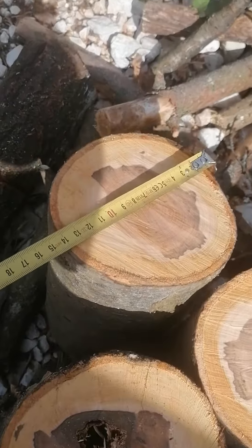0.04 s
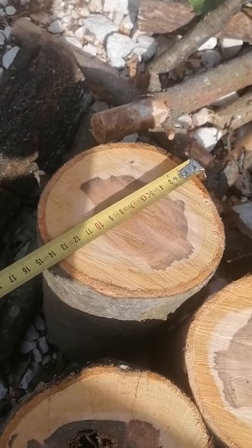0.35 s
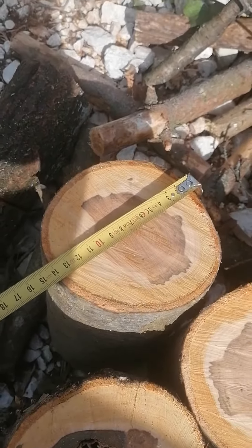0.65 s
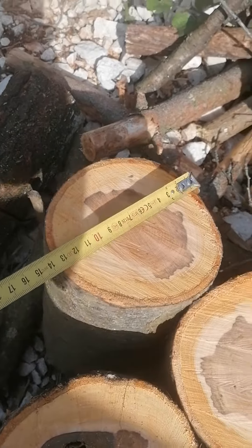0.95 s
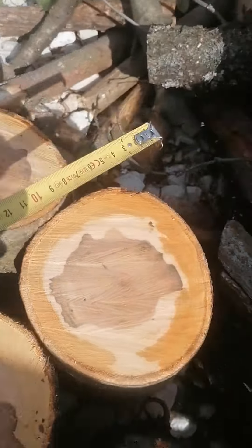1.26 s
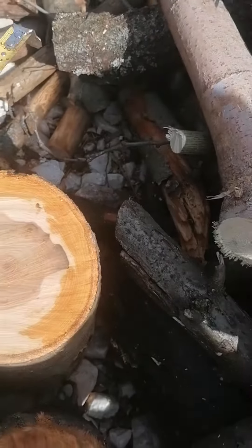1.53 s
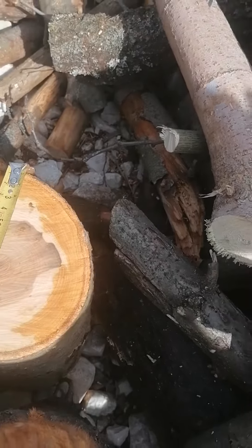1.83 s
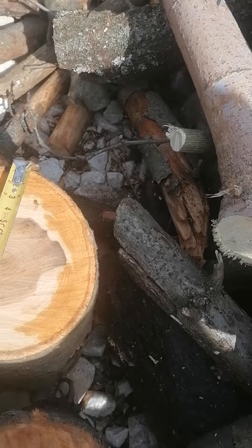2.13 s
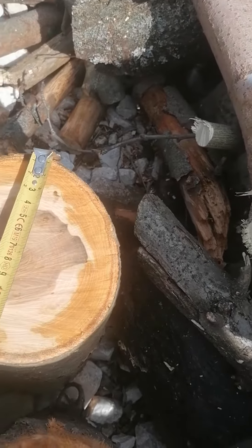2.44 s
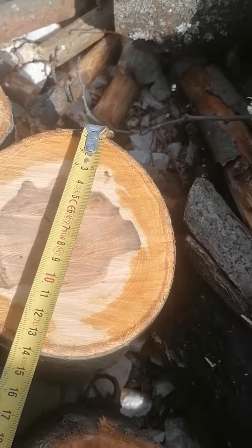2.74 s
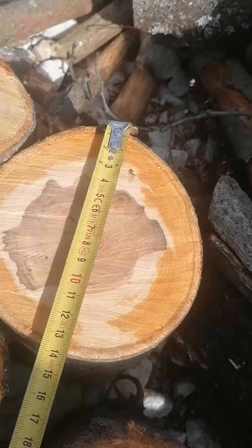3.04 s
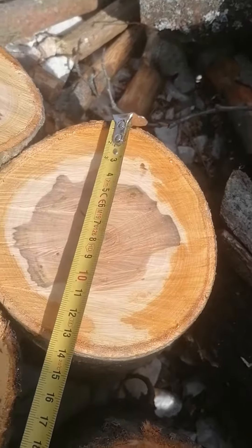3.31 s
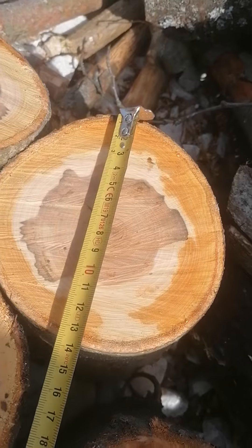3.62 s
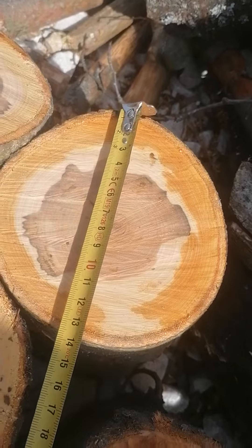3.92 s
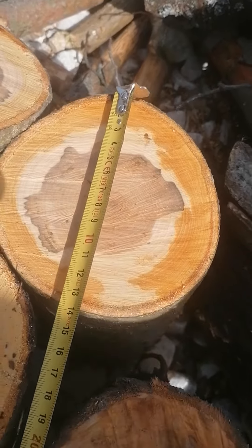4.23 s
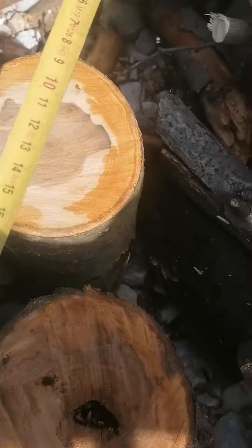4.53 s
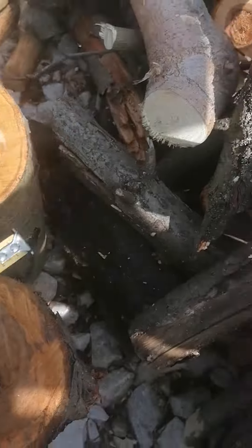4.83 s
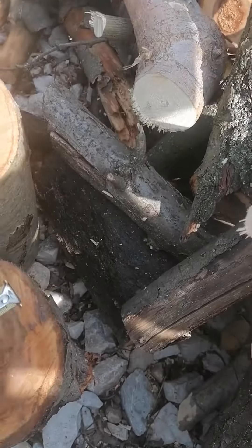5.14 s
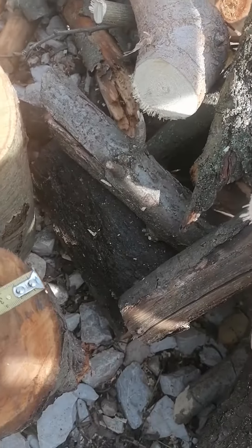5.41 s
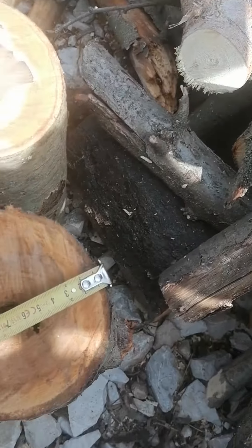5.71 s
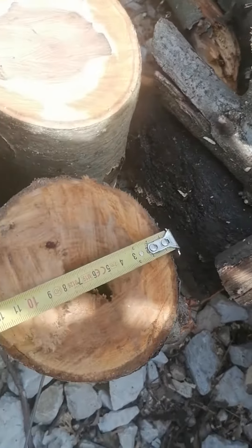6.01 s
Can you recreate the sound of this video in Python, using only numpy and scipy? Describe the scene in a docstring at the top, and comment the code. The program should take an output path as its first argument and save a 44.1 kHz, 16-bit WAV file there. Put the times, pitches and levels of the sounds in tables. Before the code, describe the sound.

A thin metal tape measure is moved across cut logs in quiet open air, after a few low puffs of wind on the microphone. It gives scattered crisp clicks and taps, a short ring and soft sliding. After one barely audible distant bird call, the blade and its loose hook rattle and scrape in a quick cluster, then thin out. A faint hiss lies underneath.

```python
"""A steel tape measure is moved over sawn log ends outdoors, in light air and a faint electronic hiss.
First air puffs on the microphones. Near 1 second the thin blade starts to tap and scrape on the wood
and its loose end hook clicks. At 1.8 seconds a harder hit sets the blade ringing.
Soft sliding leads to more taps just after 3 seconds, then a far bird calls once. From 4.4 seconds
comes the busiest run of clicks, taps and scrapes, which fades away in a last slide."""
import sys
import numpy as np
from scipy import signal
from scipy.fft import rfft, irfft, next_fast_len
from scipy.io import wavfile
from scipy.ndimage import uniform_filter1d, map_coordinates

SR = 44100
rng = np.random.default_rng(int(sys.argv[2]) if len(sys.argv) > 2 else 0)


def unload_wav(signal):
    """Save mono or channel-first audio to the path in sys.argv[1] as 16-bit WAV at rate SR, clipped to [-1, 1]."""
    wavfile.write(
        sys.argv[1],
        SR,
        np.round(np.clip(np.atleast_2d(signal).T, -1, 1) * 32767).astype(np.int16),
    )


N = 276220

# The tone of the open air. Each row: frequency in Hz, relative level in dB.
AIR_TONE = [(40, -40), (150, 4.5), (300, -2), (550, -5), (1000, -3.5), (1400, -7), (1900, -12),
            (3000, -14.5), (6000, -15.5), (15000, -45)]
# A far bird's call. Each row: time in seconds, pitch in Hz, level in dB.
BIRD_CALL = [(3.62, 3000, -88), (3.66, 3480, -77), (3.7, 3620, -74.5), (3.76, 2700, -86)]
# Steady air on the microphones. Each row: time in seconds, relative level in dB.
AIR_FLOW = [(0.0, -59.5), (2.4, -59), (2.9, -55), (3.1, -59.5), (3.6, -63), (6.26, -63.5)]
# Single puffs of air. Each row: peak time in seconds, half length in seconds, relative level in dB.
AIR_PUFFS = [(0.372, 0.028, -50), (0.582, 0.067, -45), (1.23, 0.11, -54)]
# The rumble of that air. Each row: frequency in Hz, relative level in dB.
RUMBLE_TONE = [(15, -6.5), (30, -2), (58, 1.5), (100, -6.5), (150, -15.5), (250, -30.5), (900, -50)]
# The echo of the stacked logs. Each row: frequency in Hz, seconds to fade by 60 dB.
LOG_ECHO = [(300, .09), (2500, .06), (10000, .032)]
# The tone of touched steel. Each row: frequency in Hz, relative level in dB.
STEEL_TONE = [(100, -17), (300, -31), (1200, -24), (2500, -15.5), (4200, -12), (5800, -10.5), (7300, -5.5),
              (7900, -6.5), (9000, 2), (10300, -1), (11500, -2), (12700, -10.5), (15500, -16.5)]
# The blade's ringing notes. Each row: unbent pitch in Hz, relative level in dB, seconds to fade by 60 dB.
BLADE_NOTES = [(2300, -38.5, .25), (2370, -35.5, .1), (2700, -33, .03), (4450, -38, .04), (7100, -37, .03),
               (8950, -34, .025)]
# Bending shifts all those notes together. Each row: time in seconds, lowest note in Hz.
BLADE_BEND = [(1.0, 2275), (1.8, 2309), (3.17, 2330), (4.6, 2295), (4.9, 2250), (5.6, 2255)]
# Where the tape lies. Each row: time in seconds, left level minus right level in dB.
TAPE_PAN = [(0.92, -2.5), (1.0, -5.5), (1.6, -9.5), (1.8, -11.5), (3.16, -9.5), (4.4, -15), (4.6, -8),
            (5.26, -6), (5.72, -8.5)]
# The two microphones hear steel differently. Each row: frequency in Hz, right minus left in dB.
RIGHT_BOOST = [(2500, 6), (4500, -6.5), (7500, -4), (10000, 5), (14000, 6)]
# The blade slides. Each row: start, peak and end in seconds, relative level in dB,
# then the swish's first pitch, last pitch and width in Hz.
BLADE_SLIDES = [(.35, 0.578, 0.77, -70, 2893, 2197, 600), (1.1, 1.64, 2.11, -66.5, 1664, 2090, 312),
                (2.15, 2.416, 2.85, -70.5, 2050, 2080, 484), (4.703, 5.175, 5.4, -70, 1844, 1836, 250),
                (5.641, 5.942, 6.3, -71.5, 1834, 1790, 170)]
# The blade drags over saw marks. Each row: start, peak and end in seconds, relative level in dB.
BLADE_DRAGS = [(0.915, 0.94, .974, -44.5), (1.608, 1.632, 1.635, -44), (2.771, 2.8, 2.805, -58.5),
               (4.363, 4.424, 4.445, -38), (4.494, 4.554, 4.55, -44.5), (5.149, 5.163, 5.168, -55.5),
               (4.603, 4.627, 4.626, -41), (5.264, 5.273, 5.34, -44), (5.375, 5.403, 5.435, -47),
               (5.505, 5.558, 5.58, -46), (5.651, 5.705, 5.722, -45), (5.935, 5.974, 6.015, -49)]
# A hit or scrape makes the steel clank and sets the whole blade ringing.
# Each row: start in seconds, ring gain in dB, clank gain in dB.
BLADE_RINGS = [(1.005, -25, -55), (1.2, -25, -66), (1.374, -30, -66), (1.793, -8.5, -34.5),
               (3.167, -24, -42), (4.456, -21, -52), (4.54, -24, -56), (4.611, -23, -54), (4.686, -19, -46),
               (4.854, -26, -62), (5.022, -26, -58), (5.261, -14, -42), (5.41, -21, -43), (5.556, -20, -51)]
# Crisp clicks: the hook snapping against its rivets, and light, short taps of the blade on the wood. Each row:
# start in seconds, relative level in dB.
CRISP_CLICKS = [(0.9168, -29.5), (0.9432, -34), (0.985, -37.5), (1.109, -48), (1.1221, -43.5),
                (1.139, -43.5), (1.187, -41), (1.1955, -43), (1.201, -40.5), (1.4791, -45), (1.663, -38),
                (1.754, -44), (2.913, -53), (2.944, -51), (3.1478, -44), (3.155, -29), (3.164, -38),
                (4.376, -26), (4.386, -32), (4.391, -35), (4.402, -35), (4.406, -29), (4.4135, -25),
                (4.4187, -19), (4.4236, -43), (4.4288, -27), (4.4348, -28), (4.437, -28), (4.455, -13.5),
                (4.4748, -34), (4.4945, -33.5), (4.5023, -29), (4.511, -44), (4.521, -45), (4.5319, -34.5),
                (4.539, -32.5), (4.676, -36), (4.7178, -36), (4.775, -46), (4.812, -39), (4.866, -40),
                (4.8989, -43.5), (4.992, -40), (5.311, -40), (5.327, -39.5), (5.347, -41.5), (5.569, -36),
                (5.5973, -41), (5.629, -40), (5.7196, -36.5)]
# The blade or hook hits wood. Each row: time in seconds, relative level in dB, brightness in dB,
# fade time in seconds, gain of the log's knock in dB.
TAPE_TAPS = [(0.1371, -54, -9, 0.0012, -46), (0.913, -32.5, 0, 0.0017, -50),
             (1.0042, -31.5, 6.5, 0.0016, -45.5), (1.3735, -37, 8.5, 0.0017, -56),
             (1.4342, -47.5, -5, 0.0024, -56), (1.5235, -38, -1, 0.00093, -57),
             (1.5715, -31, 3.5, 0.0064, -44), (1.6244, -26, 18, 0.00065, -52),
             (1.7922, -20, -0.5, 0.0015, -44), (3.1591, -24.5, 5.5, 0.00093, -42),
             (3.1668, -27.5, -1, 0.0011, -39), (4.415, -17.5, 19, 0.00056, -45),
             (4.4573, -31, 6, 0.0018, -41), (4.6105, -34.5, -9, 0.0073, -63), (4.66, -22, 6, 0.0023, -47),
             (4.6837, -15.5, 21.5, 0.0016, -43.5), (4.7063, -23, 7, 0.0028, -48),
             (4.729, -31.5, 5, 0.0035, -46), (4.778, -33, 8, 0.0058, -53),
             (4.853, -25.5, 23, 0.0012, -45.5), (5.0206, -34.5, 7, 0.0048, -54),
             (5.2592, -15.5, 7, 0.0028, -44), (5.277, -27, 1.5, 0.011, -56), (5.4074, -30.5, 5, 0.009, -62)]
# The hiss of the electronics. Each row: frequency in Hz, relative level in dB.
HISS_TONE = [(2000, 0), (6500, -5), (8300, 3.5), (9600, 7), (10800, 12.5), (11800, 4.5), (14000, 8.5),
             (15800, 0.5)]
# Their thin, steady whine. Each row: pitch in Hz, relative level in dB.
WHINE_NOTES = [(9561, -75), (10767, -72.5), (11967, -78.5), (13878, -81)]


def amp(db):
    """Turn decibels into a gain to multiply by."""
    return 10 ** (np.asarray(db) / 20)


def unit(x):
    """Scale a signal to an average power of 1."""
    return x / np.sqrt(np.mean(x ** 2, axis=-1, keepdims=True) + 1e-30)


def along(points, hz):
    """Read between the rows of a frequency table, spacing octaves evenly."""
    frequencies, values = np.transpose(points)
    return np.interp(np.log(hz + 1), np.log(frequencies), values)


def wobble(rate, size):
    """A smooth curve through `rate` random values a second."""
    points = rng.standard_normal(int(size * rate / SR) + 4)
    return map_coordinates(points, [np.arange(size) * rate / SR])


def filtered(x, response):
    """Multiply each frequency in x by response(hz)."""
    size = x.shape[-1]
    padded = next_fast_len(size + 8192)
    return irfft(rfft(x, padded) * response(np.fft.rfftfreq(padded, 1 / SR)), padded)[..., :size]


def noise(tone, alike):
    """Stereo noise with a given tone; `alike` is the share common to both sides."""
    white = rng.standard_normal((3, N))
    stereo = np.sqrt(1 - alike) * white[:2] + np.sqrt(alike) * white[2]
    return unit(filtered(stereo, lambda hz: amp(along(tone, hz))))


def bandpass(x, band_hz):
    """Keep mainly the sound between two frequencies."""
    return signal.sosfilt(signal.butter(2, band_hz, "bandpass", fs=SR, output="sos"), x)


def panned(pan_db):
    """Left and right gains; a positive value leans left."""
    return unit(amp(np.array([pan_db, -pan_db]) / 2))[:, None]


def place(s):
    """The tape's left-right balance in dB at second s."""
    return np.interp(s, *np.transpose(TAPE_PAN))


def add(track, s, sound):
    """Mix a sound into the track at second s."""
    part = track[:, max(0, round(s * SR)):][:, :sound.shape[1]]
    part += sound[:, :part.shape[1]]


def outdoors(level_db=-70):
    """The open air makes a quiet, nearly even wash."""
    return amp(level_db + 0.24 * wobble(1.52, N)) * noise(AIR_TONE, alike=0.52)


def bird():
    """A far bird gives one faint, blurred call that rises and falls."""
    s, hz, db = np.transpose(BIRD_CALL)
    t = np.arange(N) / SR
    pitch = np.interp(t, s, hz) * (1 + .035 * wobble(450, N))
    loudness = amp(np.interp(t, s, db)) * (t > s[0]) * (t < s[-1])
    return loudness * np.sin(2 * np.pi * np.cumsum(pitch) / SR)


def breeze(gain_db=-2, pan_db=9):
    """Air swirls on the microphones, mostly the left one: a steady rumble with a few puffs."""
    t = np.arange(N) / SR
    steady = amp(np.interp(t, *np.transpose(AIR_FLOW)))
    puffs = sum(amp(db) * np.exp(-((t - s) / half) ** 2) for s, half, db in AIR_PUFFS)
    rumble = unit(noise(RUMBLE_TONE, alike=0.52) * amp(2.4 * wobble(24, N)))
    return amp(gain_db) * (steady + puffs) * panned(pan_db) * rumble


def woodpile(sound):
    """The stacked logs scatter the sound back as a short, blurred echo."""
    hz, t, spectrum = signal.stft(rng.standard_normal((2, SR // 4)), SR, nperseg=256)
    fade = amp(-60 * t / along(LOG_ECHO, hz)[:, None])
    tail = signal.istft(spectrum * fade, SR, nperseg=256)[1]
    late_tail = np.pad(tail / np.linalg.norm(tail[0]), ((0, 0), (SR // 300, 0)))
    return signal.fftconvolve(sound.mean(axis=0)[None], late_tail, axes=1)[:, :N]


def wood(force):
    """The log's face answers a push with a dull, dead sound."""
    return bandpass(force, band_hz=[260, 1050])


def steel(force, bright_db, size=1024):
    """Give a force the tone of the blade; each spot touched favours different high notes."""
    hz = np.fft.rfftfreq(size, 1 / SR)
    tilt = np.clip(np.log2((hz + 1) / 9500) * 1.35, -.6, .1)
    ripple = unit(uniform_filter1d(rng.standard_normal((3, len(hz))), size=6, axis=1))
    spot_db = np.interp(hz, [2000, 8000], [1, 2.3]) * (ripple[2] + .5 * ripple[:2])
    sides_db = along(RIGHT_BOOST, hz) * np.array([[-.5], [.5]])
    gain = amp(along(STEEL_TONE, hz) + bright_db * tilt + sides_db + spot_db)
    # Build a filter with these gains that never sounds before the touch.
    cepstrum = irfft(np.log(gain))
    cepstrum[:, 1:size // 2] *= 2
    cepstrum[:, size // 2 + 1:] = 0
    response = irfft(np.exp(rfft(cepstrum)))
    return signal.fftconvolve(force, response, axes=1)[:, :force.shape[1]]


def ring(size, s):
    """The blade rings in a few fading notes, tuned by its bend at second s."""
    t = np.arange(size) / SR
    hz, db, fade = np.transpose(BLADE_NOTES)[:, :, None]
    bent_hz = hz / hz[0] * np.interp(s, *np.transpose(BLADE_BEND))
    detune, extra_db = rng.standard_normal((2, len(BLADE_NOTES), 1))
    cycles = bent_hz * (1 + .003 * detune) * t + rng.random((2, len(BLADE_NOTES), 1)) / 2
    notes = amp(db + extra_db - 60 * t / fade) * np.sin(2 * np.pi * cycles)
    return notes.sum(axis=1) * (1 - np.exp(-t / .002))


def slides(pan_db=-4, hiss_db=-1, swell_db=9, uneven_db=1.8, edge_s=0.057):
    """Fine rubbing makes a hollow, drifting swish and a soft hiss as the blade moves along."""
    out, t = np.zeros((2, N)), np.arange(N) / SR
    hiss = amp(hiss_db) * noise(STEEL_TONE, alike=0.21)
    for start, peak, end, db, start_hz, end_hz, width_hz in BLADE_SLIDES:
        white = rng.standard_normal((3, N))
        grain = filtered(white[:2] + white[2], lambda hz: (1 + 3 * (hz / width_hz) ** 2) ** -.7)
        centre_hz = np.interp(t, [start, end], [start_hz, end_hz])
        swish = unit(grain * np.sin(2 * np.pi * np.cumsum(centre_hz) / SR))
        drop_db = swell_db * np.interp(t, [start, peak, end], [1, 0, 1])
        loudness = amp(db - drop_db + uneven_db * wobble(25, N))
        edges = np.clip(np.minimum(t - start, end - t) / edge_s, 0, 1)
        out += panned(pan_db) * (swish + hiss) * loudness * edges
    return out


def drags(slips_per_s=2400, swell_db=9, uneven_db=3.4, ring_db=-13, rub_db=-14.5, edge_s=0.0043):
    """Tiny, uneven slips over the saw marks shake the blade and the wood under it."""
    out, t = np.zeros((2, N)), np.arange(SR // 3) / SR
    for start, peak, end, db in BLADE_DRAGS:
        slips = (rng.random(len(t)) < slips_per_s / SR) * rng.standard_normal(len(t))
        slips = slips + .13 * rng.standard_normal((2, len(t)))
        drop_db = swell_db * np.interp(start + t, [start, peak, end], [1, 0, 1])
        edges = np.clip(np.minimum(t, end - start - t) / edge_s + .5, 0, 1)
        pressure = amp(db - drop_db) * edges
        rough_slips = slips * amp(uneven_db * wobble(202, len(t)))
        scrape = unit(steel(rough_slips, bright_db=-2)) * pressure
        force = unit(slips) * pressure
        ringing = signal.fftconvolve(force, ring(len(t), peak), axes=1)[:, :len(t)]
        sides = panned(0.47 * place(peak))  # a long stretch of blade sounds more central than its tip
        add(out, start, sides * (scrape + amp(ring_db) * ringing + amp(rub_db) * wood(force)))
    return out


def blade_rings(fade_s=0.0047, low_hz=(2150, 2900), high_hz=(4200, 5800)):
    """A hit or scrape makes the steel clank in two bands and sets the whole blade ringing."""
    out, t = np.zeros((2, N)), np.arange(SR // 3) / SR
    for s, ring_db, clank_db in BLADE_RINGS:
        force = rng.standard_normal(len(t))
        clank = unit(bandpass(force, low_hz) + bandpass(force, high_hz)) * np.exp(-t / fade_s)
        add(out, s, panned(place(s)) * (amp(ring_db) * ring(len(t), s) + amp(clank_db) * clank))
    return out


def snap(shape, bright_db, apart=1.0):
    """A burst of steel chatter with a set energy; `apart` makes left and right less alike."""
    white = rng.standard_normal((3, len(shape)))
    force = shape * (white[2] + apart * white[:2])
    return unit(steel(force, bright_db)) * np.sqrt(.002 * SR / len(shape))


def clicks(rise_s=.0002, fade_s=.00045, shiver_s=.003, shiver_db=-21, ring_db=-10):
    """Crisp steel clicks, from the loose hook on its rivets and from light taps on the wood: a sharp snap, then
    a brief shiver of the blade."""
    out, t = np.zeros((2, N)), np.arange(SR // 5) / SR
    shiver = amp(shiver_db) * np.exp(-t / shiver_s)
    shape = (1 - np.exp(-t / rise_s)) * (np.exp(-t / fade_s) + shiver)
    for s, db in CRISP_CLICKS:
        click = snap(shape, bright_db=7 + 0.5 * (db + 30))  # harder hits are brighter
        add(out, s, amp(db) * panned(place(s)) * (click + amp(ring_db) * ring(len(t), s)))
    return out


def taps(graze_db=-23, graze_s=.002, rise_s=.00058, shiver_db=-24, shiver_s=.0055, ring_db=-3):
    """The steel grazes the wood, lands, then shivers and rings while the log gives a dull knock."""
    out, t = np.zeros((2, N)), np.arange(SR // 4) / SR
    lead = SR // 200  # samples of grazing before the hit
    graze = amp(graze_db) * np.exp(-t[lead:0:-1] / graze_s)
    shiver = amp(shiver_db) * np.exp(-t / shiver_s)
    for s, db, bright_db, fade_s, knock_db in TAPE_TAPS:
        blow = (1 - np.exp(-(t / rise_s) ** 2)) * np.exp(-t / fade_s)
        shape = np.concatenate([graze, blow / blow.max() + shiver])
        tap = amp(db) * snap(shape, bright_db, apart=0.99)
        knock = wood(rng.standard_normal(len(t)) * np.exp(-t / .006))
        tap[:, lead:] += amp(db + ring_db) * ring(len(t), s) + amp(knock_db) * knock
        add(out, s - lead / SR, panned(place(s)) * tap)
    return out


def scene(echo_db=-7.5):
    """Mix the tape and its echo off the logs with the breeze, the open air and the bird."""
    tape = taps() + clicks() + blade_rings() + drags() + slides()
    delay_s = np.array([[.00012], [0]])  # the tape's sound reaches the right microphone first
    tape = filtered(tape, lambda hz: np.exp(-2j * np.pi * hz * delay_s))
    return tape + amp(echo_db) * woodpile(tape) + breeze() + outdoors() + bird()


def record(dry, hiss_db=-67, pan_db=10, whine_db=-2.5, top_hz=15800):
    """The electronics add hiss and a thin whine, mostly on the left, and cut the highest treble."""
    t = np.arange(N) / SR
    whine = sum(amp(db + whine_db) * np.sqrt(2) * np.sin(2 * np.pi * hz * t + 1.1 * wobble(44, N))
                for hz, db in WHINE_NOTES)
    hiss = amp(hiss_db) * noise(HISS_TONE, alike=0)
    return filtered(dry + panned(pan_db) * (hiss + whine), lambda hz: 1 / (1 + (hz / top_hz) ** 200))


dry = scene()
out = record(dry)
unload_wav(out)
```